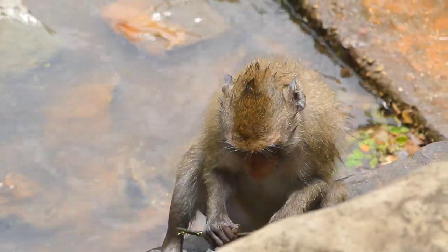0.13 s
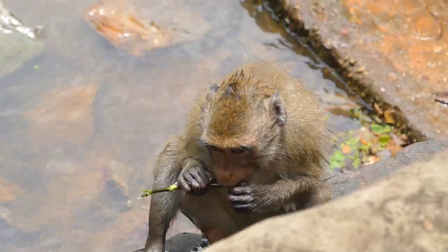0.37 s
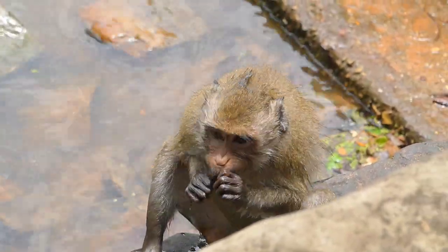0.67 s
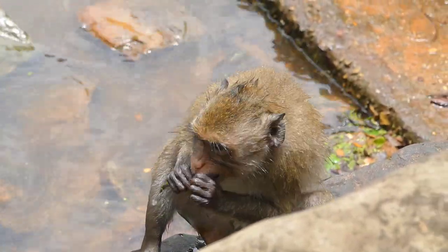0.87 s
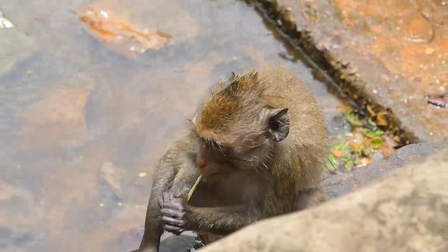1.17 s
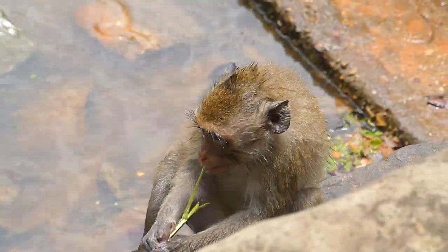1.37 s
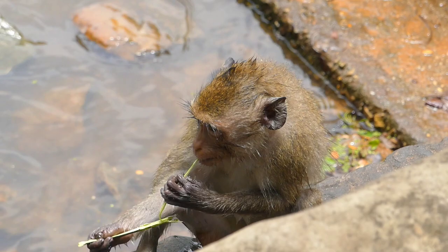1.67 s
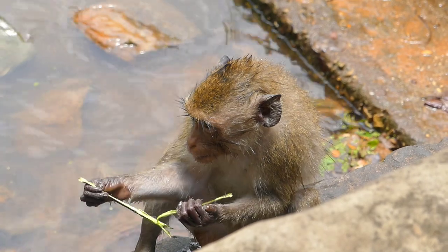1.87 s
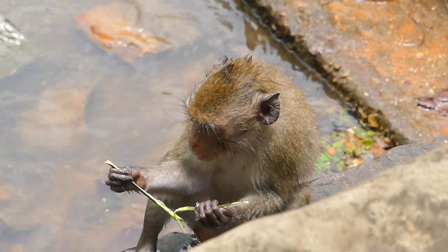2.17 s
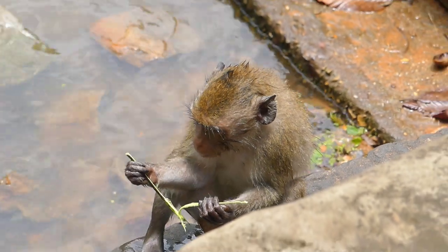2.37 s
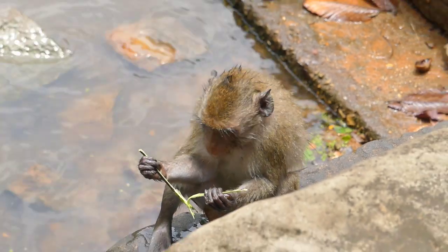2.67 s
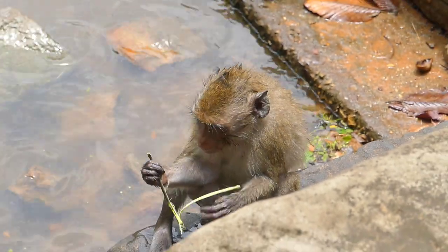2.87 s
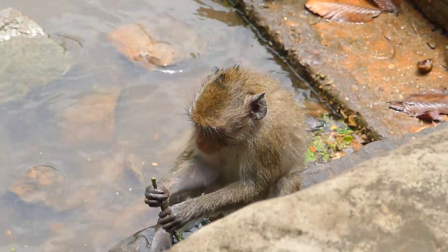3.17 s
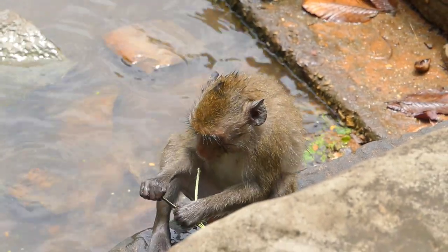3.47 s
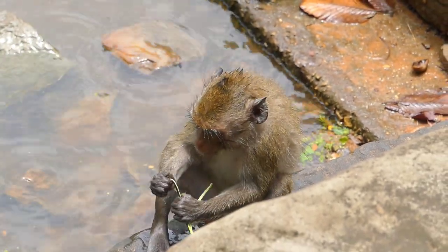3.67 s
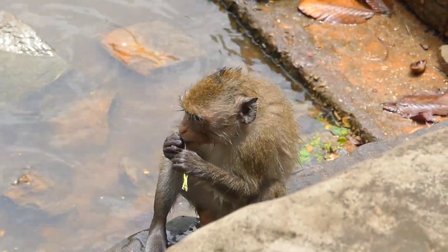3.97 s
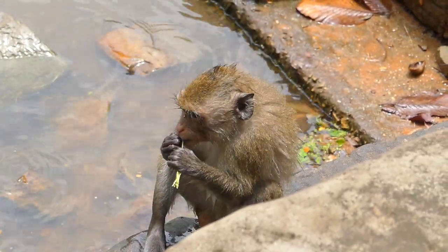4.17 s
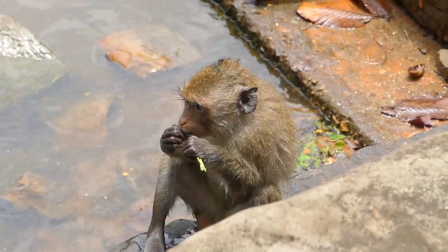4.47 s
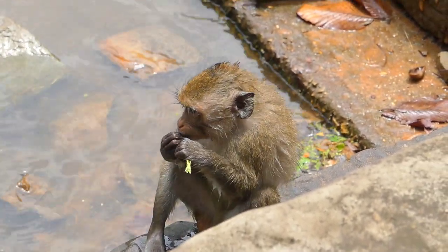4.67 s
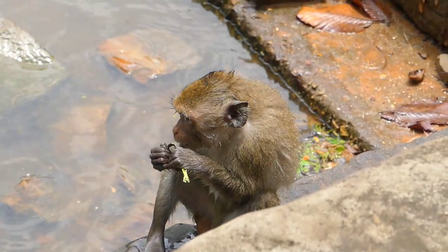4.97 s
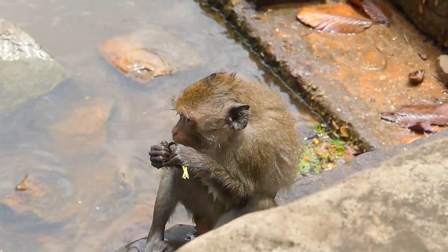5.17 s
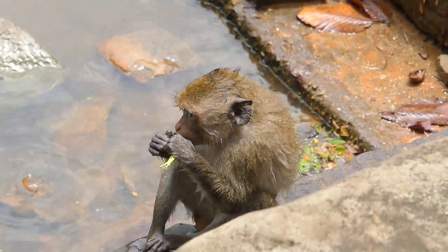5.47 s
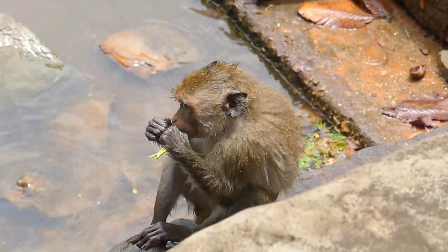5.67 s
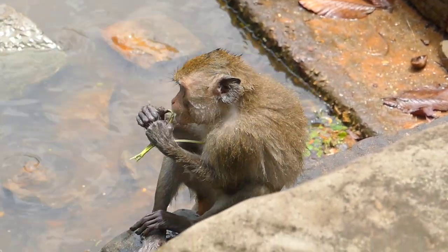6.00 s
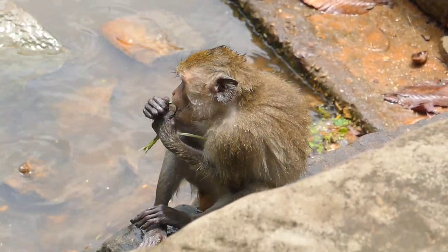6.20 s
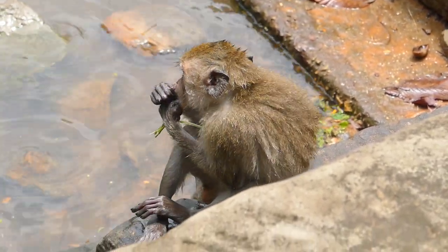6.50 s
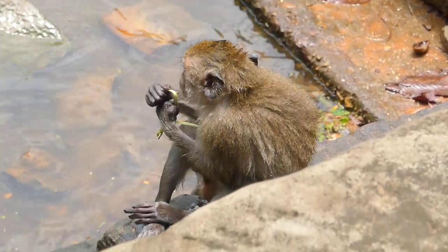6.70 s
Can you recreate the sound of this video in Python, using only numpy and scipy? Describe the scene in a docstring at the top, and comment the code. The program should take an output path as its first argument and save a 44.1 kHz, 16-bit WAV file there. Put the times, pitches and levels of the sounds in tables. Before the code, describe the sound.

Dense shrill insect drone outdoors; water plops and drips near the start, a soft distant trill rolls twice, then a green stem cracks.

```python
"""A chorus of cicadas drones in the trees around a shallow pool: clicking tymbals and hiss through resonances.
A monkey feeding at the edge pulls a stem from the water with a hollow plop and drips (ringing bubbles and
sprays of droplets), and later snaps it (bursts of band-passed noise, one for each breaking fibre).
Far off, a frog or bird gives a soft rolling trill of short damped tones.
Behind it all lie a faint low rush of air and a distant rumble, both shaped from noise."""
import sys
import numpy as np
from scipy import signal
from scipy.fft import rfft, irfft, next_fast_len
from scipy.io import wavfile
from scipy.ndimage import uniform_filter1d, map_coordinates

SR = 44100
rng = np.random.default_rng(int(sys.argv[2]) if len(sys.argv) > 2 else 0)


def master(y):
    """Save y as 16-bit WAV."""
    cut = np.clip(np.atleast_2d(y).T, -1, 1)
    pcm = np.round(cut * 32767)  # scale
    wavfile.write(sys.argv[1], SR, pcm.astype(np.int16))


N = 301644  # length of the scene in samples
TOP_HZ = 15250  # upper band limit of the whole scene

# Body resonances of the insects, low and middle register.
# Each row: centre in Hz, width in Hz, relative level in dB.
DRONE_RESONANCES = [(1773, 177, 0.5), (1590, 133, -8), (2040, 280, -12.5)]
WHINE_RESONANCES = [(3436, 318, 1.5), (3197, 244, -6), (3770, 400, -7), (2400, 560, -24)]
# Tone colour of the rasp of the nearer cicadas. Each row: frequency in Hz, relative density in dB per Hz.
RASP_COLOUR = [(2500, -44), (3700, -6.5), (4350, -1), (4750, -3.5), (5350, 0), (5900, -5), (6850, -6.5),
               (7450, -12.5), (8400, -13.5), (9600, -12), (12000, -16.5), (15000, -23)]
# How hard each register sings, with one swell.
# Each holds: steady level in dB, swell in dB, time of the swell in seconds, its half length in seconds.
DRONE_EFFORT = (-40.85, 1.7, 2.5, 0.3)
WHINE_EFFORT = (-31.5, 1.24, 1.96, 0.4)
RASP_EFFORT = (-34.0, 0.85, 0.5, 0.95)
EASE_S, EASE_LENGTH_S = 1.8, 1.2  # when the chorus eases off, and over how long


def cicadas():
    """Three registers of the chorus, each swelling and fluttering, and one thin, high insect that recedes."""
    drone_clicks = patchy(tymbals(220, hiss_share=0.64, count=8), depth_db=1.5)
    whine_clicks = patchy(tymbals(260, hiss_share=0.56, count=8), depth_db=1.23)
    rasp_clicks = patchy(tymbals(450, hiss_share=0.76, count=12), depth_db=1.38)
    drone = surround(drone_clicks, resonances(DRONE_RESONANCES))
    whine = surround(whine_clicks, resonances(WHINE_RESONANCES))
    rasp = surround(rasp_clicks, lambda hz: amp(along(RASP_COLOUR, hz)))

    # the thin insect is noise through one very narrow resonance, and rides on the level of the rasp
    thin = surround(rng.standard_normal((2, N)), resonances([(7690, 45, 0)]))
    thin_db = -22.5 - 4 * step(EASE_S, EASE_LENGTH_S)

    drone_db = effort(*DRONE_EFFORT) + 0.28 * wobble(6.4)
    whine_db = effort(*WHINE_EFFORT) + 0.53 * wobble(30)
    rasp_db = effort(*RASP_EFFORT) + 0.2 * wobble(14)
    return amp(drone_db) * drone + amp(whine_db) * whine + amp(rasp_db) * (rasp + amp(thin_db) * thin)


def tymbals(click_hz, hiss_share, count):
    """Many insects click their tymbals, each at its own rate; a share of steady hiss is mixed in."""
    clicks = np.zeros((2, N))
    for insect in range(count):
        rate = click_hz * np.exp(.2 * rng.standard_normal() + .04 * wobble(25))
        cycles = np.cumsum(rate) / SR + rng.random()
        at = np.flatnonzero(np.diff(np.floor(cycles)))  # one click for each whole cycle
        clicks[insect % 2, at] += np.sign(rng.standard_normal(N)[at])
    hiss = rng.standard_normal((2, N))
    return np.sqrt(1 - hiss_share) * unit(clicks) + np.sqrt(hiss_share) * hiss


def patchy(pair, depth_db):
    """Uneven grain: narrow strands of the sound swell and fade at random."""
    z = signal.stft(pair, nperseg=1024)[2]
    grain = rng.standard_normal(z.shape[1:])
    across_pitch = uniform_filter1d(grain, size=3, axis=0)
    field = uniform_filter1d(across_pitch, size=7, axis=1)  # smoothed along time as well
    return signal.istft(z * amp(depth_db * unit(field)), nperseg=1024)[1][:, :N]


LULL_SHARE, LULL_AFTER = 0.55, 3.2  # depth of the lull as a share of the swell, its delay in half lengths
EARLY_DB = 0.7  # the whole chorus starts this much louder


def effort(steady_db, swell_db, swell_s, half_length_s):
    """Level of one register in dB: a steady song with one smooth swell and a lull after it."""
    u = (np.arange(N) / SR - swell_s) / half_length_s
    swell = np.exp(-u ** 2) - LULL_SHARE * np.exp(-(u - LULL_AFTER) ** 2)
    early_db = EARLY_DB * (1 - step(EASE_S, EASE_LENGTH_S))
    return steady_db + swell_db * swell + early_db


# Air pockets that ring in the water. Each row: start in seconds, pitch at the start in Hz, level in dB.
BUBBLES = [(.1745, 774, -27), (.1786, 554, -27), (.1832, 985, -13.5), (.186, 1220, -22),
           (0.1972, 910, -23.5), (.2524, 806, -33), (0.2753, 1220, -29), (.306, 1130, -33),
           (.5582, 950, -35.5), (.562, 450, -40), (1.298, 1245, -38), (4.7638, 1006, -42.5)]
# Water lifted by the hands and falling back.
# Each row: start in seconds, level at the start in dB, centre pitch in Hz, fade time in seconds.
SPLASHES = [(.178, -37, 874, 0.02), (.195, -36.5, 2360, .025), (.26, -50.5, 950, .16),
            (.558, -47.5, 390, .018), (.835, -51.5, 1000, 0.083), (2.557, -48, 1100, .008),
            (4.765, -60, 1200, 0.028)]
RING_CYCLES = 34  # every bubble falls by 60 dB within this many cycles of its starting pitch


def water():
    """Hands in the shallows throw spray and trap bubbles, which climb in pitch near the surface."""
    pool = np.zeros(N)
    for s, hz, db in BUBBLES:
        bubble = ring(hz, RING_CYCLES / hz, rise=0.036, attack=.0007)
        add(pool, s, amp(db) * bubble)
    for s, db, hz, fade in SPLASHES:
        splash = spray(hz, fade, spread=0.27, cycles=10.6, count=70)
        add(pool, s, amp(db) * splash)
    return pool


def spray(centre_hz, fade, spread, cycles, count):
    """A burst of tiny ringing ticks or droplets that thins out and weakens, rms 1 at its start."""
    burst = np.zeros(SR)
    for delay, size, pitch in rng.standard_normal((count, 3)):
        hz = min(centre_hz * np.exp(spread * pitch), TOP_HZ)
        drop = ring(hz, cycles / hz, rise=0.36, attack=0.0001)
        add(burst, fade * abs(delay), amp(2.5 * size - 4.6 * abs(delay)) * drop)
    start = burst[:int(fade * SR)]
    return burst / np.sqrt(np.mean(start ** 2) + 1e-20)


# The green stem tears.
# Each row: start in seconds, level in dB before the fibres vary it, length in seconds.
TEARS = [(3.7235, -28, .003), (3.7833, -20, .04)]
FIBRE_GAP_S, FIBRE_T60_S = .0035, 0.021  # basic spacing of the breaking fibres, and the decay of each
THICK_FIBRE_HZ, THIN_FIBRE_HZ, THINNING_S = 790, 2820, 0.0055  # thick fibres go first, thin ones last
THICK_SOFTER_DB = 6.5  # the thickest fibres give way with a softer crack
TEAR_FADE_DB_PER_S = 190
SKIN_HZ, SKIN_DB, SKIN_DELAY_S, SKIN_FADE_S = 10000, -19.5, .009, 0.0092  # fine crackle of the splitting skin


def stem(width):
    """Fibres break one after another, each a broad, dry crack, brighter as the tear runs on and fades."""
    t = np.arange(SR // 20) / SR
    cracks = np.zeros(N)
    for s, db, length in TEARS:
        for age in np.arange(0, length, FIBRE_GAP_S):
            thick = np.exp(-age / THINNING_S)
            hz = THIN_FIBRE_HZ + (THICK_FIBRE_HZ - THIN_FIBRE_HZ) * thick
            edges_hz = [hz / (1 + width), min(hz * (1 + width), TOP_HZ)]
            band = signal.butter(2, edges_hz, "bandpass", fs=SR, output="sos")
            snap = rng.standard_normal(len(t)) * amp(-60 * t / FIBRE_T60_S)
            crack = signal.sosfilt(band, snap)
            crack_db = db - THICK_SOFTER_DB * thick - TEAR_FADE_DB_PER_S * age + 2 * rng.standard_normal()
            late_s = FIBRE_GAP_S * rng.uniform(0, 0.46)
            add(cracks, s + age + late_s, amp(crack_db) * crack / np.abs(crack).max())
        skin = spray(SKIN_HZ, SKIN_FADE_S, spread=.25, cycles=5, count=50)
        add(cracks, s + SKIN_DELAY_S, amp(db + SKIN_DB) * skin)
    return cracks


# Phrases of the far trill.
# Each row: start in seconds, length in seconds, level in dB before the swell shapes it.
TRILL = [(1.75, .39, -34.5), (2.266, .23, -35.5)]
TRILL_SWELL_DB = 3  # each phrase swells this much from its ends to its middle


def trill(pitch_hz, upper_hz, pulse_hz, t60):
    """A far throat gives phrases of evenly spaced notes that sag in pitch, each with a weaker upper resonance."""
    call = np.zeros(N)
    for s, length, db in TRILL:
        for age in np.arange(0, length, 1 / pulse_hz):
            arch = np.sin(np.pi * age / length)
            waver = 1 + 0.017 * rng.standard_normal()
            low = ring(pitch_hz * waver, t60, rise=-.08, attack=0.0041)
            upper = ring(upper_hz * waver, t60, rise=-.02, attack=.004)
            note_db = db + TRILL_SWELL_DB * (arch - 1.5) + rng.standard_normal()
            add(call, s + age, amp(note_db) * (low + amp(-7) * upper))
    return call


# Tone colour of the air and far water. Each row: frequency in Hz, relative density in dB per Hz.
AIR_COLOUR = [(25, -38), (100, -19), (200, -7.5), (330, -1), (460, 3.5), (560, 1), (700, -2), (870, 1),
              (1000, -1.5), (1130, -4.5), (1330, -8.5), (4000, -19)]
# Tone colour of the distant rumble. Each row: frequency in Hz, relative density in dB per Hz.
RUMBLE_COLOUR = [(20, -32), (50, -33), (90, -11), (140, -1), (200, -11), (280, -9), (420, -27)]
RUSH_DB = -54.5
# the far rumble swells once and then slowly recedes
RUMBLE_DB, RUMBLE_SWELL_DB, RUMBLE_SWELL_S, RUMBLE_SWELL_LENGTH_S = -70, 8.5, 2.0, .5
RUMBLE_FADE_DB_PER_S = 0.46


def air():
    """A faint rush of air and far water, noise that drifts only slightly, over a distant rumble."""
    grainy = patchy(rng.standard_normal((2, N)), depth_db=2.1)
    rush = surround(grainy, lambda hz: amp(along(AIR_COLOUR, hz)))
    rush_db = RUSH_DB + .6 * wobble(5)

    rumble = surround(rng.standard_normal((2, N)), lambda hz: amp(along(RUMBLE_COLOUR, hz)))
    swell = step(RUMBLE_SWELL_S, RUMBLE_SWELL_LENGTH_S)
    since_s = np.arange(N) / SR - RUMBLE_SWELL_S
    swell_db = (RUMBLE_SWELL_DB - RUMBLE_FADE_DB_PER_S * since_s) * swell
    rumble_db = RUMBLE_DB + swell_db + .8 * wobble(6)
    lean_db = np.array([[.5], [-.5]])  # the rumble sits slightly to the left
    return amp(rush_db) * rush + amp(rumble_db + lean_db) * rumble


# Echo of banks and trees. Each row: frequency in Hz, time to fall by 60 dB in seconds.
BANKS_T60 = [(200, .3), (1000, 0.38), (10000, .15)]


def banks(x):
    """Stone banks and trees give a short diffuse answer: decaying noise, shorter in the bass and treble."""
    hz, t, z = signal.stft(rng.standard_normal((2, SR // 2)), SR, nperseg=256)
    decay = amp(-60 * t / along(BANKS_T60, hz)[:, None])
    tail = signal.istft(z * decay, SR, nperseg=256)[1]
    delayed = np.pad(x, (400, 0))  # in samples, about 9 ms
    return signal.fftconvolve(delayed[None], tail / np.linalg.norm(tail[0]), axes=1)[:, :N]


# How alike left and right are. Each row: frequency in Hz, likeness from -1 (opposite) to 1 (identical).
LIKENESS = [(60, 0.86), (150, 0.47), (270, -0.22), (450, 0.15), (750, 0.13), (1200, 0.61), (1750, 0.93),
            (2400, 0.79), (3400, 0.97), (4200, 0.93), (5400, 0.95), (7000, 0.955), (9000, 0.7),
            (12000, 0.22), (15000, -.2)]


def surround(pair, colour):
    """Two unrelated signals become one coloured sound that arrives from all around, rms 1."""
    def mid_side_gains(hz):
        turn = np.arccos(np.clip(along(LIKENESS, hz), -1, 1)) / 2
        return colour(hz) * np.array([np.cos(turn), np.sin(turn)])

    mid, side = filtered(pair, mid_side_gains)
    return unit(np.array([mid + side, mid - side]))


def resonances(modes):
    """Gain of steep-sided resonances whose powers add."""
    def gain(hz):
        peaks = [amp(db) / (1 + ((hz - c) / w * np.sqrt(2)) ** 2) for c, w, db in modes]
        return np.sqrt(sum(peak ** 2 for peak in peaks))

    return gain


def ring(hz, t60, rise, attack):
    """A short damped tone whose pitch glides as it fades."""
    t = np.arange(int(1.5 * t60 * SR) + 2) / SR
    phase = 2 * np.pi * hz * t * (1 + rise * t / t60)
    swing = np.sin(phase) * amp(-60 * t / t60) * (1 - np.exp(-t / attack))
    # only the change of volume radiates, so no bass escapes
    return np.gradient(swing) * SR / (2 * np.pi * hz)


def wobble(rate):
    """A smooth random curve, rate knots a second."""
    knots = rng.standard_normal(int(N * rate / SR) + 4)
    return map_coordinates(knots, [np.arange(N) * rate / SR])


def step(middle_s, length_s):
    """A smooth change from 0 to 1, one value per sample."""
    return .5 + .5 * np.tanh(2 * (np.arange(N) / SR - middle_s) / length_s)


def filtered(x, response):
    """x shaped by a gain that depends on frequency."""
    m = next_fast_len(N + SR // 2)
    return irfft(rfft(x, m) * response(np.fft.rfftfreq(m, 1 / SR)), m)[..., :N]


def along(points, hz):
    """Read (Hz, value) points on a log frequency axis."""
    f, v = np.transpose(points)
    return np.interp(np.log(hz + 1), np.log(f + 1), v)


def amp(db):
    """Decibels to gain."""
    return 10 ** (np.asarray(db) / 20)


def unit(x):
    """x at rms 1."""
    return x / np.sqrt(np.mean(x ** 2) + 1e-20)


def add(track, s, sound):
    """Mix a sound into a track at time s in seconds."""
    part = track[max(round(s * SR), 0):][:len(sound)]
    part += sound[:len(part)]


# Stereo lean of the chorus. Each row: frequency in Hz, left minus right in dB.
CHORUS_LEAN = [(500, 0), (1400, -1.4), (3200, -0.7), (6000, -0.2), (9000, -1), (15000, -2.2)]


def scene():
    """The chorus all around and a little to the right, the monkey and the trill in the centre, air behind."""
    sides = np.array([[.5], [-.5]])
    chorus = filtered(cicadas(), lambda hz: amp(along(CHORUS_LEAN, hz) * sides))
    far_call = trill(pitch_hz=912, upper_hz=1040, pulse_hz=24.95, t60=0.034)
    events = water() + stem(width=0.5) + far_call
    return chorus + events + amp(-12.0) * banks(events) + air()


def record(dry):
    """Thin the deep bass with a second-order slope and keep nothing above the band limit."""
    low_cut_hz = 48

    def response(hz):
        bass_cut = hz ** 2 / np.sqrt(hz ** 4 + low_cut_hz ** 4)
        return bass_cut * (hz < TOP_HZ)

    return filtered(dry, response)


dry = scene()
out = record(dry)
master(out)
```